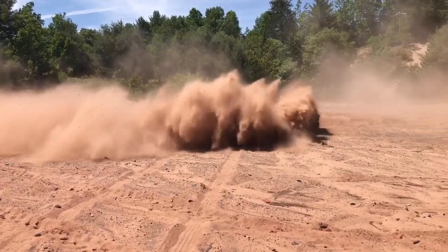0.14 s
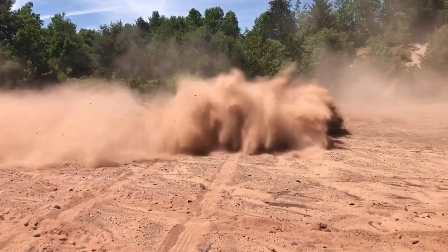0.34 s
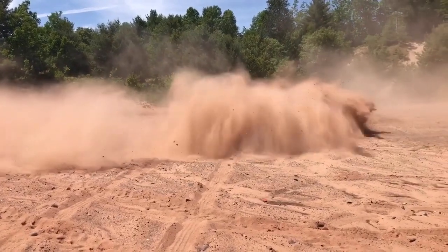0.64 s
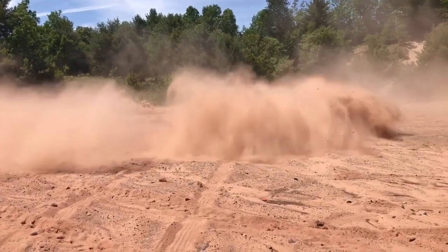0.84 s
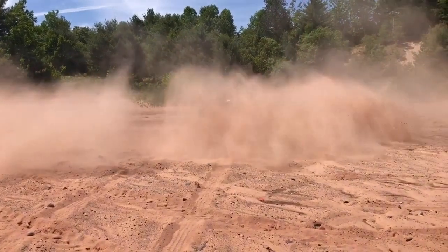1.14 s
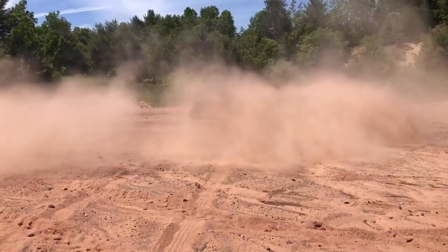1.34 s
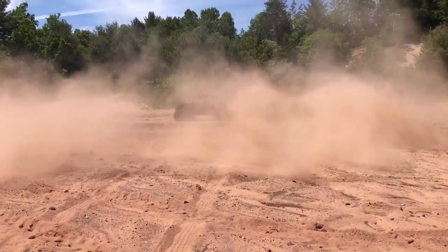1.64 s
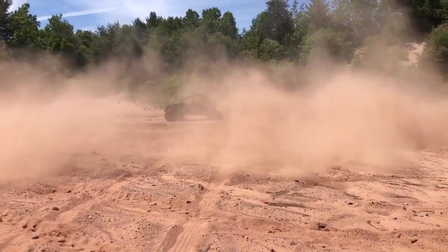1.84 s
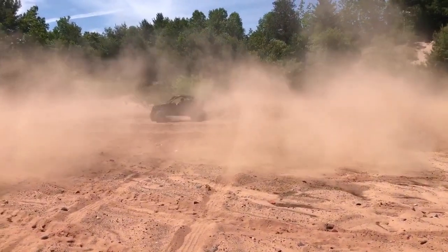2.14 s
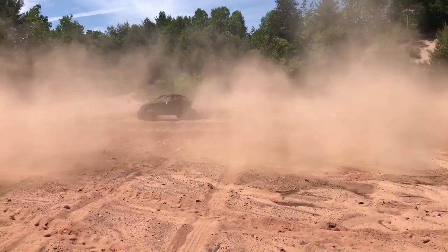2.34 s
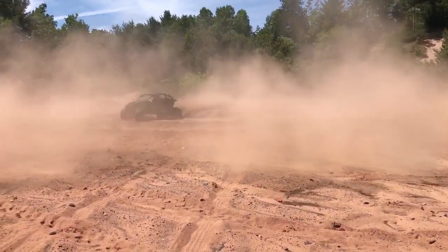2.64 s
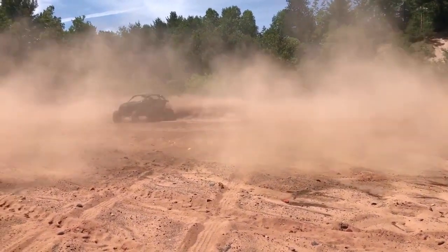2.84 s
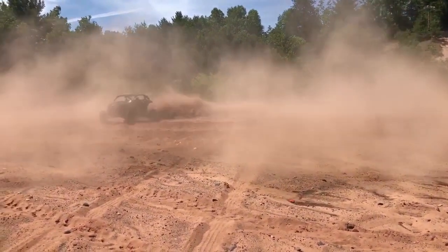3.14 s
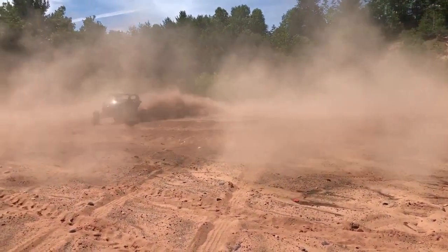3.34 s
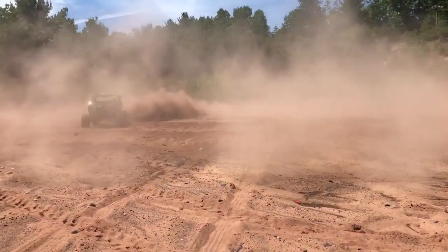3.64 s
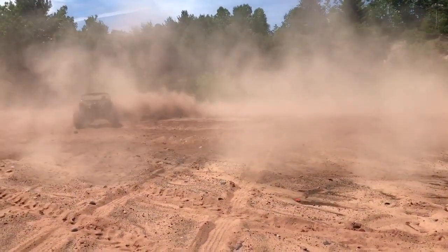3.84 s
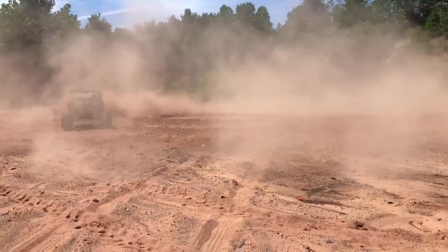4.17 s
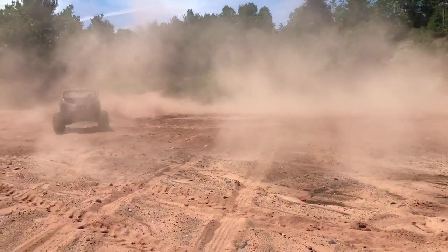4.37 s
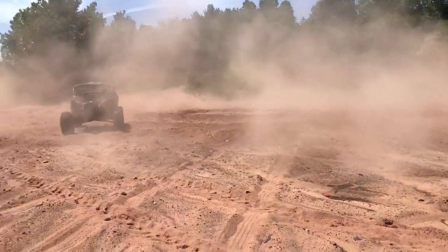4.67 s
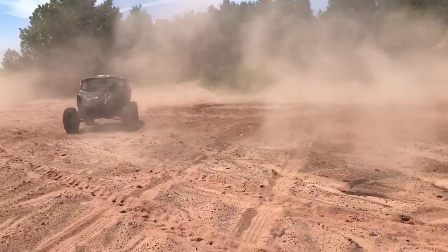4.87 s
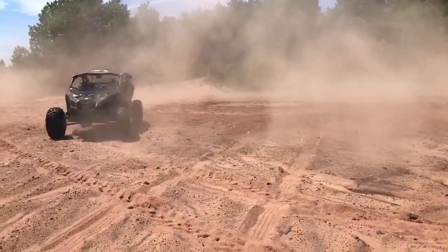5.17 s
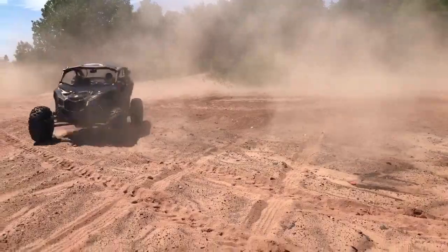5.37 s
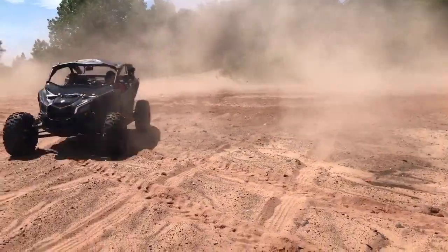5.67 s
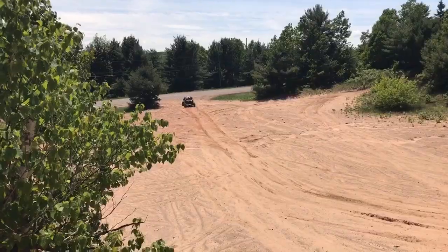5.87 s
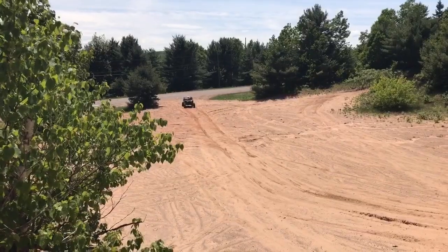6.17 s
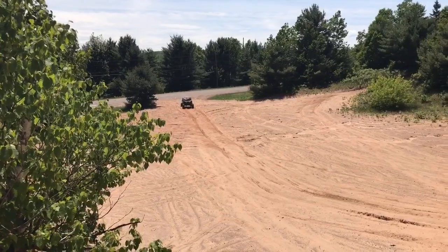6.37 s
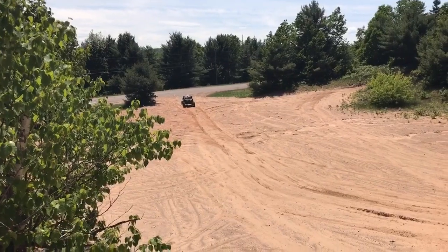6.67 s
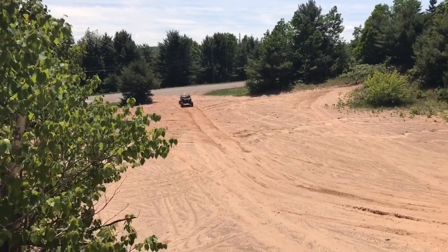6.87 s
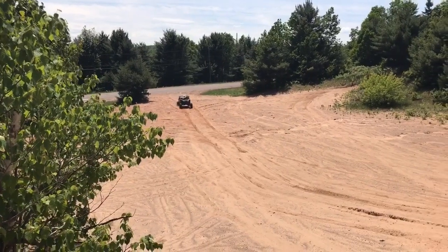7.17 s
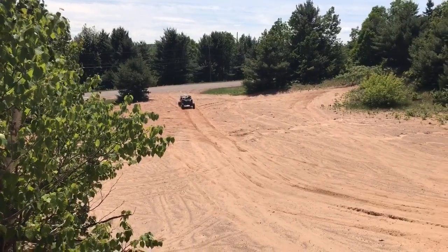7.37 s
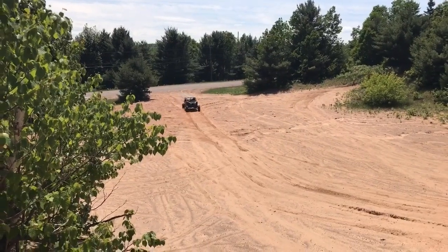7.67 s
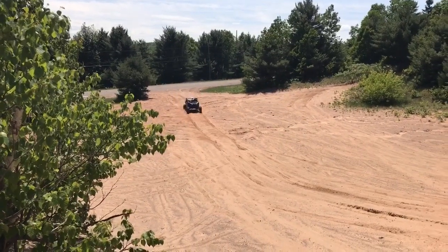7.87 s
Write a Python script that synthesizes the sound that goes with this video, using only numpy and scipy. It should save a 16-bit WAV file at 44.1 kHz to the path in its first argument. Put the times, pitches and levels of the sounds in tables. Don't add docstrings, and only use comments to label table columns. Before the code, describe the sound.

Outdoors on loose sand, a three-cylinder off-road engine is already at high revs, a deep, slightly wavering boom with few muffled firing tones. Exhaust rasp and tyre spray form a broad flickering hiss, swelling strongest around 0.7-1.5 s, with soft bumps near 0.4, 1.1 and 1.4 s. From 1.6 to 3.5 s the roar continues rougher and slightly thinner, its colour shifting as the car turns; the spray drops near 3.7 s. Revs sag from about 4.1 s, stumble at 4.6 with a knock, blip briefly lower, then slow into a lumpy coast. A deep thud lands at 5.05 s, followed by bright squeaks and grit scuffs around 5.2-5.46. Total silence spans 5.56-5.82 s. Then a distant engine returns at high revs, jumping higher near 6.4 s and gently rising to 8 s, with duller sand hiss, sparse close ticks and faint squeaks around 7.6-7.7.

```python
import sys
import numpy as np
from scipy import signal
from scipy.fft import rfft, irfft, next_fast_len
from scipy.io import wavfile
from scipy.ndimage import uniform_filter1d, minimum_filter1d, map_coordinates

SR = 44100
rng = np.random.default_rng(int(sys.argv[2]) if len(sys.argv) > 2 else 0)


def voltage_ratio(decibels):
    exponent = np.asarray(decibels, float) / 20
    return 10 ** exponent


def to_wav(s):
    ch = np.atleast_2d(s).T
    pcm = np.round(np.clip(ch, -1, 1) * 32767)
    wavfile.write(sys.argv[1], SR, pcm.astype(np.int16))


N = 353241
FFT_SIZE = next_fast_len(N)
TIME = np.arange(N) / SR
# (start [s], end [s])
CUT_S = (5.5565, 5.8183)
# (low edge [Hz], high edge [Hz])
LAYER_EDGES_HZ = [(20, 45), (600, 1700), (1700, 3200), (3200, 5200), (5200, 15000)]


def in_time(rows):
    s, *columns = np.transpose(rows)
    return [np.interp(TIME, s, column) for column in columns]


def bell(s, length, order=2):
    return np.exp(-((TIME - s) / length) ** order)


def rms_one(x):
    return x / np.sqrt(np.mean(x ** 2) + 1e-20)


def drift(rate):
    r = np.exp(-80 * np.pi * rate / SR)
    noise = rng.standard_normal(N // 40 + 2002)
    slow = signal.lfilter([1], [1, -2 * r, r * r], noise)[2000:]
    return np.interp(np.arange(N) / 40, np.arange(len(slow)), rms_one(slow))


def coloured(slope, peaks=()):
    hz = np.fft.rfftfreq(FFT_SIZE, 1 / SR) + 1e-3
    slope_hz, slope_db = np.transpose(slope)
    level_db = np.interp(np.log(hz), np.log(slope_hz), slope_db, left=-90, right=-90)
    for centre_hz, width_hz, lift_db in peaks:
        level_db = level_db + lift_db / (1 + (2 * (hz - centre_hz) / width_hz) ** 2)
    return hz, voltage_ratio(level_db) * rfft(rng.standard_normal(FFT_SIZE))


def as_sound(spectrum):
    return irfft(spectrum, FFT_SIZE)[:N]


def band_db(hz, spectrum, low, high):
    inside = (hz > low) & (hz < high)
    return 10 * np.log10(2 * np.sum(np.abs(spectrum[inside]) ** 2) / FFT_SIZE ** 2)


def burst(length):
    t = np.arange(round(4 * length * SR)) / (length * SR)
    shape = 3.02 * (1 - np.exp(-t / 0.35)) * np.exp(-2.0 * t ** 2)
    return rng.standard_normal(SR)[:len(t)], shape


def add(out, s, sound):
    at = round(s * SR)
    out[at:at + len(sound)] += sound[:N - at]


def flutter(level_db):
    # (frequency [Hz], level [dB per Hz])
    gas_slope = [(40, -25), (80, -9.5), (150, -2.5), (300, -3), (450, -10.5), (560, -20.5), (900, -47)]
    _, spectrum = coloured(gas_slope)
    return voltage_ratio(level_db + 0.67 * drift(9.6)) * rms_one(as_sound(spectrum))


def engine():
    # (time [s], firing rate [Hz], boom [dB], bark [dB])
    spinning = [(0, 154, -13.5, -11), (.43, 155.4, -15.5, -11), (.78, 160, -11, -13.5),
                (1.07, 160, -20.5, -13.5), (1.19, 151.5, -16, -13), (1.44, 163, -18.5, -14),
                (1.57, 145.6, -19.5, -18), (1.97, 151.3, -21.5, -18.5), (2.17, 155, -19, -18),
                (2.46, 150, -14, -19), (2.7, 154.7, -17, -19.5), (3.19, 161, -16, -17),
                (3.41, 150.4, -14.5, -11.5), (3.48, 160.6, -14.5, -18), (3.74, 149, -15, -15),
                (3.96, 148.7, -16.5, -14.5), (4.11, 134, -16.5, -15.5), (4.28, 140.7, -13, -13.5)]
    # (time [s], firing rate [Hz], boom [dB], bark [dB])
    coasting = [
        (4.382, 126.8, -16.5, -16),
        (4.58, 112.2, -18.5, -21),
        (4.625, 62, -12, -36),
        (4.672, 89.4, -10.5, -20),
        (5.015, 92.13, -11.5, -22),
        (5.035, 90.3, -15.5, -40),
        (5.11, 78.8, -12, -36.5),
        (5.342, 67.76, -11.5, -37),
        (5.55, 62.8, -10, -29.5),
    ]
    # (time [s], firing rate [Hz], boom [dB], bark [dB])
    climbing = [(5.82, 133.7, -17.5, -23), (6.09, 138.9, -20.5, -25), (6.229, 138.6, -20, -27),
                (6.519, 159.5, -18, -26.5), (6.99, 155.1, -18, -28), (7.15, 159.4, -16, -27),
                (7.25, 156.6, -18, -29), (7.7, 162, -17, -27.5), (8.01, 167.3, -15.5, -29)]
    # (time [s], length [s], depth [dB])
    second_fades = [(0.44, .06, 3.5), (1.852, 0.11, 14), (2.29, 0.14, 10), (3.3, 0.12, 12.5),
                    (3.435, 0.027, 13.5), (6.0, 0.52, 11), (6.284, 0.054, 40)]
    # (time
    # [s], length [s], depth [dB])
    third_fades = [(2.0, 0.44, -6), (2.8, .3, 8), (5.15, 0.14, -9), (7.4, 1, -7.5)]
    # (time [s], length [s], flutter [dB])
    ragged = [
        (1.128, 0.042, 7),
        (2.007, 0.39, 7),
        (5.3, .25, 3),
        (6.9, 1.14, -3),
    ]
    # (thirds of the firing rate [count], level under the main tones [dB])
    uneven = [(1, -26.5), (4, -22.5), (5, -22.5), (7, -22.5), (8, -28)]
    # (start [s], end [s])
    stumble_s = (4.59, 4.668)
    muffler_cut_hz, cut_steepness, order_fall_db = 401, 25.8, 2.5
    upright_hz, lean_per_hz = 122, 0.018
    intake_hz, intake_width_hz = 93.3, 9.7
    missed = 0.45

    firing_hz, boom_db, bark_db = in_time(spinning + coasting + climbing)
    wobble = 1 + 0.01007 * drift(20.9) + 0.00499 * drift(5.93)
    phase = 2 * np.pi * np.cumsum(firing_hz * wobble) / SR

    levels_db = [boom_db]
    for order in range(2, 6):
        muffled_db = 10 * np.log10(1 + (order * firing_hz / muffler_cut_hz) ** cut_steepness)
        levels_db.append(bark_db - order_fall_db * (order - 2) - muffled_db)
    for k, fades in [(1, second_fades), (2, third_fades)]:
        levels_db[k] = levels_db[k] - sum(db * bell(s, length, order=4) for s, length, db in fades)

    tone = np.zeros(N)
    for k, db in enumerate(levels_db):
        lean = lean_per_hz * (firing_hz - upright_hz) * k
        tone -= voltage_ratio(db + 0.87 * drift(12.3)) * np.cos((k + 1) * phase + lean)

    off_tune = (2 * firing_hz / 3 - intake_hz) / intake_width_hz * 2
    intake_db = boom_db - 5.5 - 10 * np.log10(1 + off_tune ** 2) + 0.6 * drift(5)
    tone += voltage_ratio(intake_db) * np.cos(2 * phase / 3 + 0.58 * drift(5.8))

    mean_db = uniform_filter1d(0.42 * boom_db + 0.44 * levels_db[1], size=35000)
    ragged_db = sum(db * bell(s, length) for s, length, db in ragged)
    for thirds, under_db in uneven:
        level_db = mean_db + under_db + 0.7 * ragged_db + 3.3 * drift(5)
        tone += voltage_ratio(level_db) * np.cos(thirds * phase / 3 + 1.26 * drift(2.2))

    start, end = stumble_s
    firing = np.clip(np.maximum(start - TIME, TIME - end) / 0.014 + 1, 1 - missed, 1)
    return np.sqrt(2) * firing * tone + flutter(mean_db - 12.5 + ragged_db), phase


def rumble():
    # (frequency [Hz], level [dB per Hz])
    rut_slope = [(12, -23), (25, -9.5), (40, -2.5), (65, -0.5), (110, -2), (200, -31), (400, -38)]
    level_db = -39 + drift(4.3) + 0.7 * drift(7.3)
    hz, spectrum = coloured(rut_slope)
    return as_sound(spectrum) * voltage_ratio(level_db - band_db(hz, spectrum, *LAYER_EDGES_HZ[0]))


def layers(shares):
    # (time [s], spray [dB], exhaust share [dB])
    near_spray = [(0, -31.5, 8), (.4, -32, 9), (.72, -23.5, 2), (1.1, -21.5, -3.5), (1.43, -23.5, -1),
                  (1.6, -27.5, 0.5), (2.05, -28, 5), (2.22, -26.5, -2.5), (2.45, -28, 1), (2.8, -28, 2.5),
                  (3.3, -28.5, -0.5), (3.55, -30, 0.5), (3.72, -38, 4.5), (4.2, -36.5, 2.5),
                  (4.38, -35.5, 5.5), (4.52, -39.5, 3.5), (4.75, -42, 4.5), (5.55, -39.5, 6)]
    # (time [s], spray [dB], exhaust share [dB])
    far_spray = [(5.82, -36, -5), (5.95, -37.5, -0.5), (6.05, -42.5, -1.5), (6.3, -43, 3), (6.6, -40, 3),
                 (7.0, -38.5, 1.5), (7.35, -36.5, 0), (7.8, -35.5, 1.5), (8.01, -35, 2)]
    usual_db = -33
    spray_db, exhaust_db = in_time(near_spray + far_spray)
    levels_db = []
    for over_db, swing, exhaust in shares:
        levels_db.append(usual_db + over_db + swing * (spray_db - usual_db) + exhaust * exhaust_db)
    return levels_db


def hiss(slope, peaks, layers_db, phase, patchy_db, pulsing):
    hz, spectrum = coloured(slope, peaks)
    gains_db = [db - band_db(hz, spectrum, *edge) for db, edge in zip(layers_db, LAYER_EDGES_HZ[1:])]
    centres = np.log2([1050, 2400, 4100, 7000])
    together = drift(21)
    out = np.zeros(N)
    for octave in np.arange(9, 14.1, 0.5):
        window = np.cos(np.pi / 2 * np.clip(2 * (np.log2(hz) - octave), -1, 1)) ** 2
        gain_db = sum(np.interp(octave, centres, share) * db for share, db in zip(np.eye(4), gains_db))
        flicker_db = patchy_db * (0.63 * together + drift(8.6))
        out += voltage_ratio(gain_db + flicker_db) * as_sound(window * spectrum)
    return out * (1 + pulsing * np.cos(phase - 1.5))


def bounce(x):
    # (time [s], delay [ms], strength [0-1])
    path = [(.3, 1.43, 0.88), (1.4, 1.4, 0.77), (2.4, 1.36, 0.53), (3.1, 1.23, 0.03), (4.4, 1.07, 0.44)]
    # (low edge [Hz], high edge [Hz])
    band_hz = (1830, 3600)
    delay_ms, strength = in_time(path)
    band = signal.sosfiltfilt(signal.butter(2, band_hz, "band", fs=SR, output="sos"), x)
    late = map_coordinates(band, [np.arange(N) - delay_ms * SR / 1000], order=3)
    return (x + strength * late) / np.sqrt(1 + 0.25 * strength ** 2)


def resonance(x, centre_hz, gain, width_hz):
    out, state = np.zeros(N), np.zeros(2)
    r = np.exp(-np.pi * width_hz / SR)
    b = [(1 - r * r) / 2, 0, (r * r - 1) / 2]
    for i in range(0, round(CUT_S[1] * SR), 512):
        a = [1, -2 * r * np.cos(2 * np.pi * centre_hz[i] / SR), r * r]
        out[i:i + 512], state = signal.lfilter(b, a, x[i:i + 512], zi=state)
    return x + np.maximum(gain, -1) * out


def near_hiss(phase):
    # (frequency [Hz], level [dB per Hz])
    slope = [(400, -52.5), (650, -11.5), (1000, -4), (1500, -6.5), (2400, -10.5), (3300, -12.5),
             (5500, -17), (7200, -21), (8500, -21), (12400, -28), (13200, -33), (15500, -39.5),
             (15700, -74.5)]
    # (centre [Hz], width [Hz], lift [dB])
    peaks = [(2430, 340, 8), (4470, 210, 2.5), (7000, 1540, 9.5)]
    # (level over spray [dB], share of its swing [ratio], share of exhaust [ratio])
    shares = [(0, 0.77, 0.78), (2, 1.16, 0.23), (0.3, 0.88, 0.01), (-1.5, 1.09, 0.083)]
    # (time [s], length [s], centre [Hz], width
    # [Hz], swell [gain])
    swells = [(.1, 0.22, 1000, 380, .5), (0.79, 0.21, 1300, 260, 2), (0.62, 0.27, 2850, 450, 1.46),
              (1.4, 0.18, 2850, 260, .6), (1.9, 1.1, 2545, 140, -0.4), (.6, 0.55, 3400, 150, -.5),
              (1.0, 0.86, 3550, 250, .5), (1.5, 0.18, 3900, 300, .7), (2.9, 0.62, 4000, 400, 0.74),
              (2.3, 1.8, 2019, 500, .5), (4.67, 0.67, 2400, 250, .55)]
    # (time [s], lower [Hz], its
    # depth [0-1], upper [Hz], its depth [0-1])
    gaps = [(1, 8000, 0.06, 10600, 0.06), (2.2, 8240, .95, 10250, 0.4), (3.6, 8600, 0.7, 10410, .9)]
    near = bounce(hiss(slope, peaks, layers(shares), phase, patchy_db=1.03, pulsing=0.077))
    for s, length, centre_hz, width_hz, swell in swells:
        near = resonance(near, np.full(N, centre_hz), swell * bell(s, length), width_hz)
    lower_hz, lower_depth, upper_hz, upper_depth = in_time(gaps)
    near = resonance(near, lower_hz, -lower_depth, width_hz=1200)
    return resonance(near, upper_hz, -upper_depth, width_hz=1230)


def still_air():
    # (frequency [Hz], level [dB per Hz])
    floor_slope = [(250, -2), (450, 3.5), (800, 1), (1500, -16.5), (6000, -41), (15500, -32.5),
                   (15700, -72)]
    _, spectrum = coloured(floor_slope)
    return voltage_ratio(-42.5) * rms_one(as_sound(spectrum))


def thuds():
    # (time [s], level [dB], length [s], top [Hz])
    bumps = [
        (0.363, -20.5, .05, 248),
        (1.129, -24, 0.047, 257),
        (1.44, -21, 0.064, 300.3),
        (3.35, -25, .08, 102),
        (4.61, -24, 0.02, 400),
        (4.66, -21, 0.0148, 447),
        (5.048, -18, 0.034, 119.7),
    ]
    out = np.zeros(N)
    for s, db, length, top_hz in bumps:
        noise, shape = burst(length)
        low = signal.sosfilt(signal.butter(3, [30, top_hz], "band", fs=SR, output="sos"), noise)
        add(out, s - length / 2, voltage_ratio(db) * shape * rms_one(low))
    return out


def scuffs():
    # (time [s], level [dB], length [s], lowest [Hz])
    ticks = [(.95, -31, .04, 6000), (1.09, -32, .04, 6000), (4.066, -38.5, .012, 8000),
             (4.2, -41, .03, 5000), (4.36, -63.5, 0.041, 4030), (5.19, -49, .006, 4510),
             (5.239, -48.5, 0.012, 3500), (5.258, -31, 0.042, 3507), (5.263, -29, .02, 10500),
             (5.29, -36, .015, 6000), (5.363, -38.5, .015, 5010), (5.405, -38, 0.034, 9500),
             (5.457, -39, .015, 7000), (5.891, -42.5, 0.037, 6080), (6.755, -38, .004, 6010),
             (6.95, -41, 0.0062, 8000), (6.983, -34.5, 0.01, 3490), (7, -40.5, 0.013, 7945),
             (7.232, -42.5, 0.0063, 8890), (7.388, -36, 0.0052, 5960), (7.42, -29.5, 0.003, 5533),
             (7.446, -50, .006, 6000), (7.558, -41, 0.0077, 800), (7.83, -49, .004, 7010),
             (7.997, -39, .008, 2994)]
    out = np.zeros(N)
    for s, db, length, low_hz in ticks:
        noise, shape = burst(length)
        bright = signal.lfilter(*signal.butter(2, [low_hz, 15500], "band", fs=SR), noise)
        add(out, s, voltage_ratio(db) * shape * bright)
    return 1.46 * signal.lfilter(*signal.butter(1, 7000, fs=SR), out)


def squeaks():
    # (time [s], level [dB], start [Hz], end [Hz], length [s])
    rubs = [(3.71, -32, 5720, 5700, 0.024), (4.287, -35, 5400, 5514, 0.044),
            (5.176, -38, 3968, 4047, 0.011), (5.261, -26.5, 5800, 7650, 0.043),
            (5.267, -27, 4120, 3550, 0.021), (5.289, -39, 5020, 4750, 0.018),
            (5.403, -24.5, 5880, 6550, .025), (5.414, -33, 7200, 7590, 0.019),
            (5.455, -30, 5800, 5500, 0.02), (7.557, -30.5, 5200, 5020, 0.012),
            (7.718, -34, 5305, 5104, 0.011)]
    out = np.zeros(N)
    for s, db, start_hz, end_hz, length in rubs:
        noise, shape = burst(length)
        width_hz = 600 + 0.58 * abs(end_hz - start_hz)
        rough = 0.84 + rms_one(signal.lfilter(*signal.butter(2, width_hz / 2, fs=SR), noise))
        progress = np.minimum(np.arange(len(noise)) / (length * SR), 1.05)
        glide_hz = start_hz + (end_hz - start_hz) * progress
        add(out, s, voltage_ratio(db) * shape * rough * np.sin(2 * np.pi * np.cumsum(glide_hz) / SR))
    return out


def far_hiss(phase):
    # (frequency [Hz], level [dB per Hz])
    slope = [(400, -24), (650, -34.5), (1150, -18), (1550, -19.5), (2200, -5), (3000, -16.5), (5000, -22.5),
             (8000, -39.5), (12500, -46.5), (13500, -66.5), (15500, -64), (15700, -90)]
    # (centre [Hz], width [Hz], lift [dB])
    peaks = [(1070, 120, 0.98), (2170, 350, 3.5), (3880, 530, 2.93)]
    # (level over spray [dB], share of its swing [ratio], share of exhaust [ratio])
    shares = [(3.5, 0.53, 0.49), (12, 0.56, .3), (-0.7, 1, 0.073), (-10.5, 0.81, -.5)]
    return hiss(slope, peaks, layers(shares), phase, patchy_db=0.58, pulsing=0.064)


def scene():
    tone, phase = engine()
    steady = tone + rumble() + still_air()
    spray = np.where(TIME < CUT_S[1], near_hiss(phase), far_hiss(phase))
    return (steady + spray + thuds() + scuffs() + squeaks())[None]


def starved(x):
    hz, _, frames = signal.stft(x, SR, nperseg=2048, noverlap=1024)
    power = np.abs(frames[:1024].reshape(128, 8, -1)) ** 2
    level_db = 10 * np.log10(power.sum(axis=1) + 1e-14)
    centre_hz = hz[4:1024:8, None]
    around_db = uniform_filter1d(level_db, size=11, axis=0)
    masked = (level_db < around_db - 6.5) & (centre_hz > 4500)

    treble_db = 10 * np.log10(power[29:70].sum(axis=(0, 1)) + 1e-14)
    chance = uniform_filter1d(rng.standard_normal(level_db.shape), size=4, axis=0)
    chance = rms_one(uniform_filter1d(chance, size=4, axis=1))
    crowded = np.clip((minimum_filter1d(treble_db, size=7) + 38) / 6, -0.5, 1.1)
    patches = (chance < crowded) & (centre_hz > 12900 + 250 * chance)

    frames[:1024] *= np.repeat(~(masked | patches), 8, axis=0)
    return signal.istft(frames, SR, nperseg=2048, noverlap=1024)[1][:N]


def roll_off(x):
    return signal.sosfilt(signal.butter(12, 15630, fs=SR, output="sos"), x)


def record(dry):
    thinned = starved(np.clip(dry[0], -0.99, 0.99))
    outside_s = np.maximum(CUT_S[0] - TIME, TIME - CUT_S[1])
    fade = np.clip(outside_s / 0.0003 + 0.5, 0, 1)
    mix = thinned[None] * np.sin(np.pi / 2 * fade) ** 2
    return roll_off(mix)


dry = scene()
out = record(dry)
to_wav(out)
```